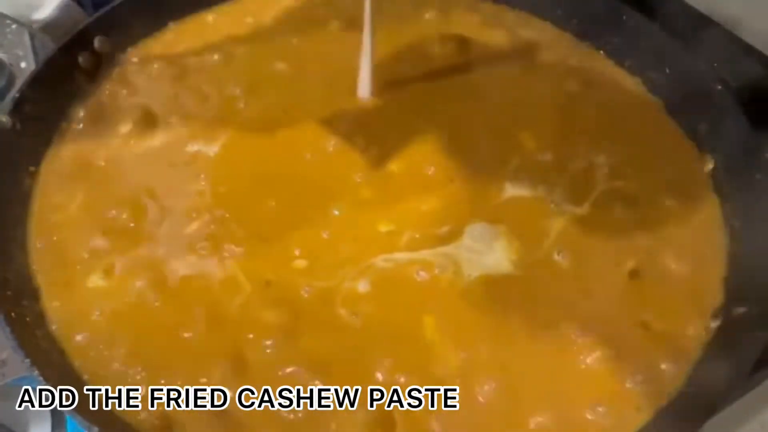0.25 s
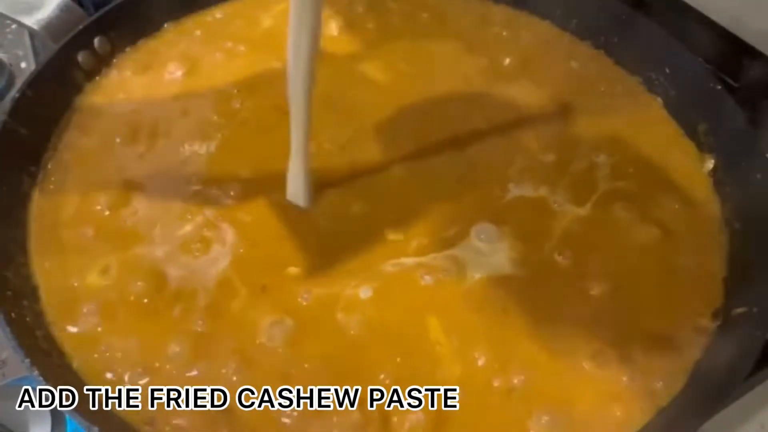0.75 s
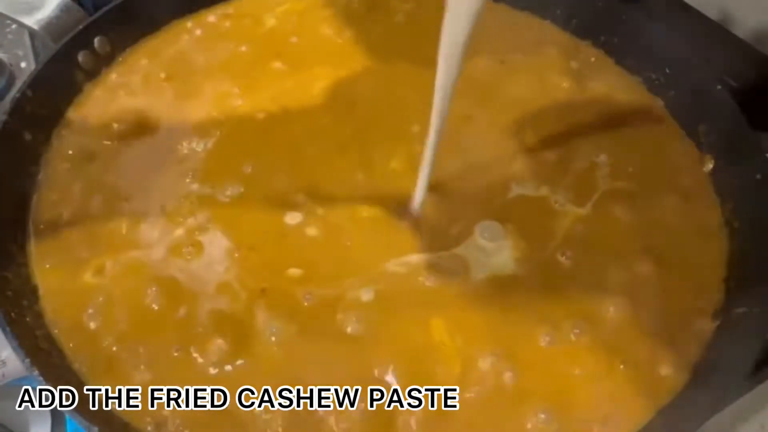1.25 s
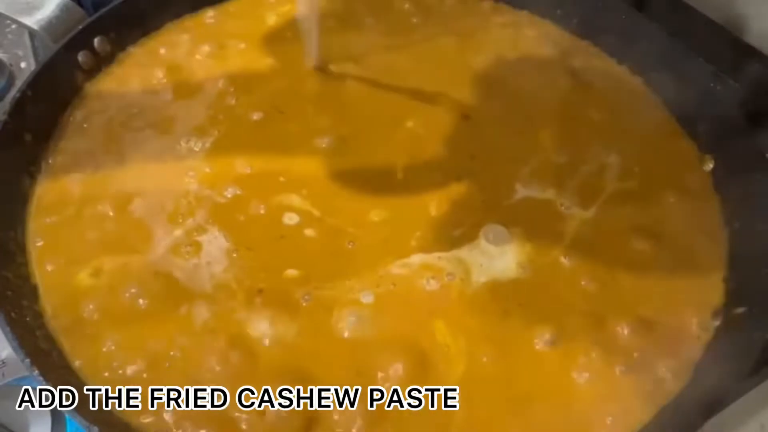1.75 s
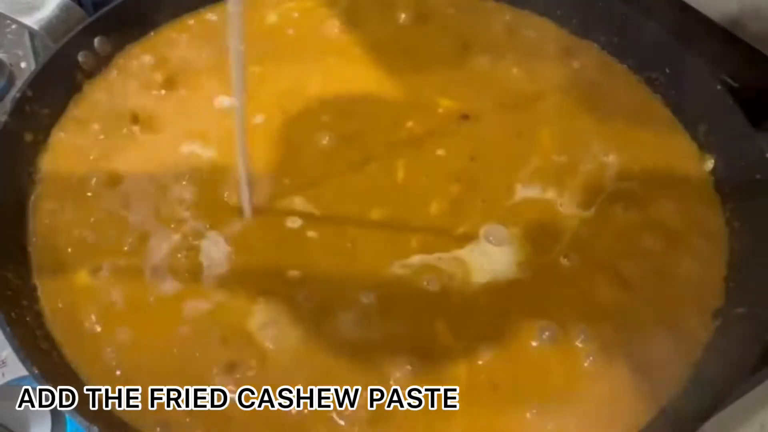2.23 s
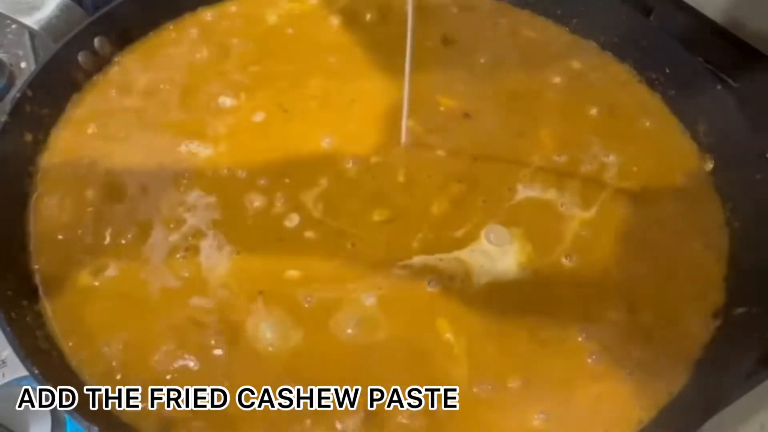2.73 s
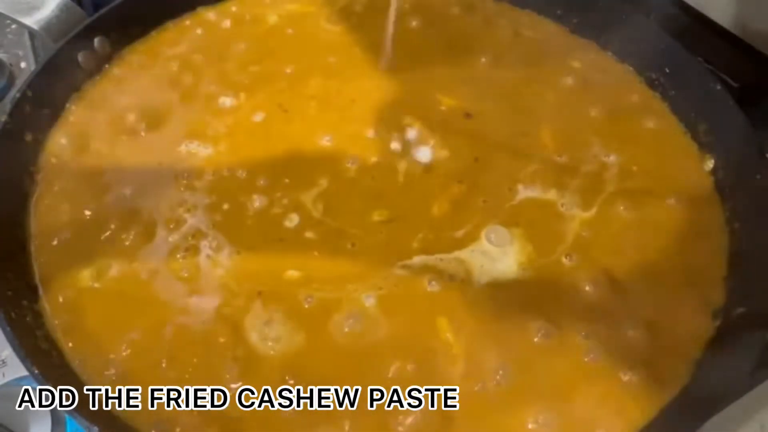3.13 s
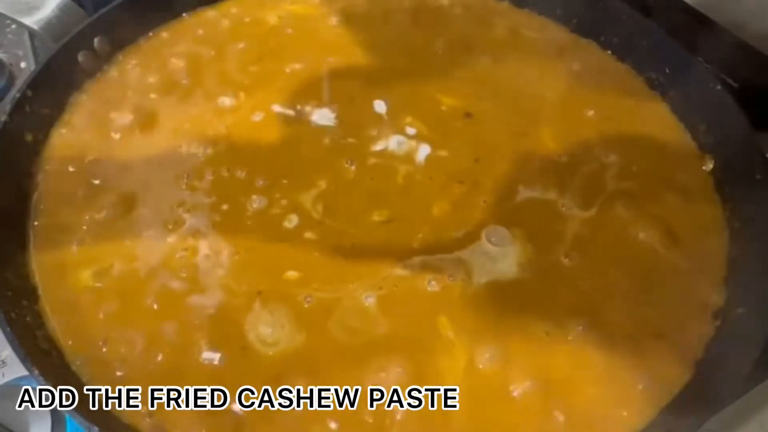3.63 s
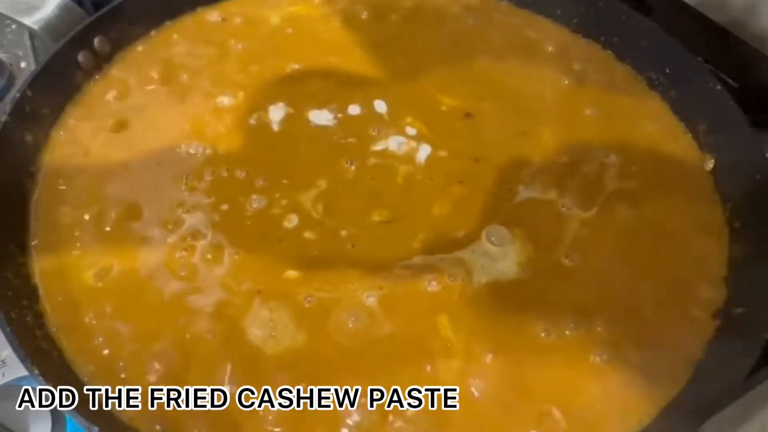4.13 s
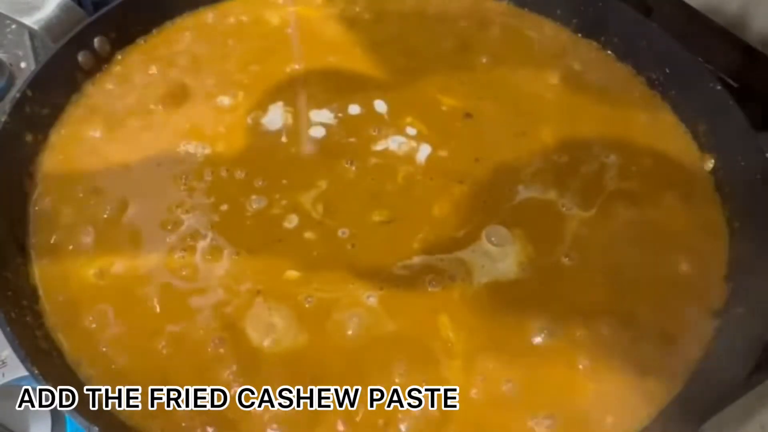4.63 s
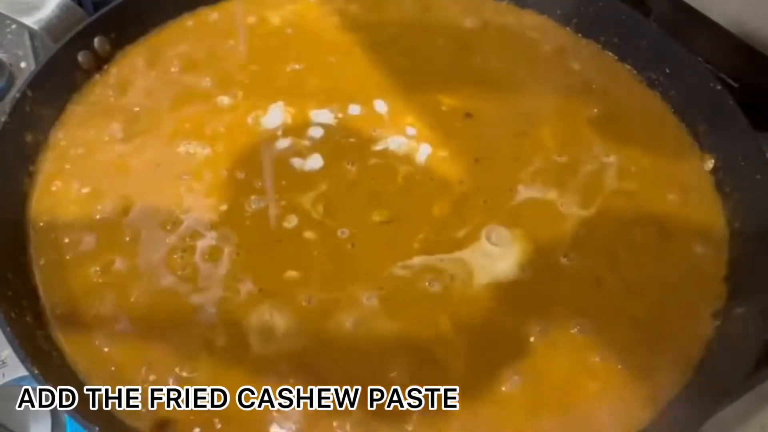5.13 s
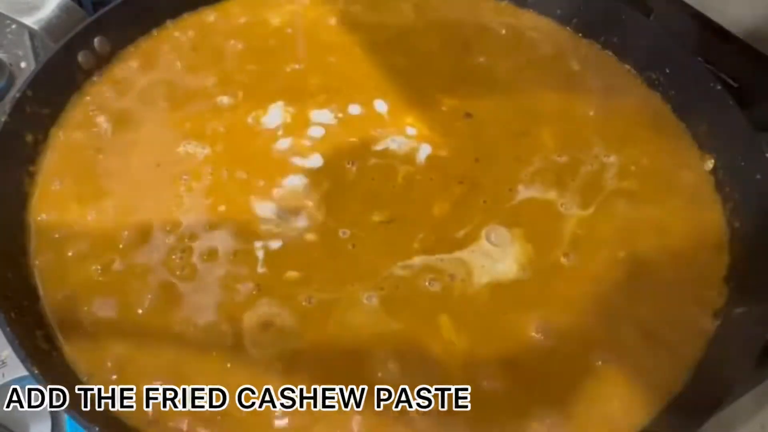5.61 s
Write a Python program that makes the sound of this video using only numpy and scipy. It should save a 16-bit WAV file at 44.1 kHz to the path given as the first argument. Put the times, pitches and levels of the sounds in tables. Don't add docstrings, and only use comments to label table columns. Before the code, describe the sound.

Close stereo pickup above a pan of thick gravy on a kitchen stove. A low burner rumble and soft hiss run throughout. Small bubbles murmur, bigger ones burst with short rising plops, mostly to the left, amid crisp spatter ticks and low bumps. After four seconds a vessel scuffs and knocks twice, quickly and loudly; then the simmer continues with a thin sizzle.

```python
import sys
import numpy as np
from scipy import signal
from scipy.fft import rfft, irfft, next_fast_len
from scipy.io import wavfile
from scipy.ndimage import uniform_filter1d, minimum_filter1d

SR = 44100
rng = np.random.default_rng(int(sys.argv[2]) if len(sys.argv) > 2 else 0)


def to_wav(s):
    ch = np.atleast_2d(s).T
    pcm = np.round(np.clip(ch, -1, 1) * 32767)
    wavfile.write(sys.argv[1], SR, pcm.astype(np.int16))


def level_to_linear(level):
    exponent = np.asarray(level, float) / 20
    return 10 ** exponent


N = 258867

# time in seconds, level in dB.
FLAME = [(0, -52), (1.05, -53), (1.8, -51.5), (2.7, -54.5), (2.93, -50), (3.5, -53), (4.05, -53.5),
         (4.36, -49.5), (4.69, -54.5), (5.02, -50.5), (5.3, -52.5), (5.87, -52)]
# pitch in Hz, level in dB per Hz.
RUMBLE = [(24, -40), (36, -4), (50, -2), (100, -0.5), (200, -9.5), (400, -30.5), (800, -20.5)]
# pitch in Hz, width in Hz, level in dB.
STOVE_HUM = (51.8, 11, -5.5)
# pitch in Hz, level in dB per Hz.
HISS = [(250, 9.5), (400, 4), (630, 3.5), (1000, 6), (1600, 6), (2500, 1.5), (4000, -1), (5500, 2),
        (7500, -5), (8500, -6.5), (10000, -4.5), (11000, -1), (11700, -4.5), (12600, -20)]
# pitch in Hz, width in Hz, level in dB.
FLAME_NOTE = (630.5, 86, -11.5)
# pitch in Hz, likeness from 0 to 1.
LIKENESS = [(60, 1), (130, 1), (270, 0.93), (600, 0.44), (1250, 0.21), (2300, 0.34), (4000, 0.63),
            (6000, 0.079), (7400, 0.021), (8500, 0.83), (10000, 0.82), (11200, 0.91)]
# time in seconds, level in dB.
SIZZLE = [
    (0, -65),
    (1.5, -67),
    (3, -69),
    (4.2, -67.5),
    (4.8, -57.5),
    (5.87, -59.5),
]
# time in seconds, small bubbles in dB.
VIGOUR = [
    (0, -47),
    (1, -49.5),
    (1.6, -55.5),
    (2.4, -49.5),
    (3.4, -61.5),
    (3.86, -51),
    (4.1, -56),
    (5.87, -70),
]
# start in seconds, peak in dB, pitch in Hz.
BLIPS = [(.123, -44, 774), (.203, -45, 670), (.386, -43, 810), (.584, -50, 670), (0.768, -43.5, 590),
         (.855, -43.5, 710), (1.094, -47, 730), (1.119, -43, 720), (1.238, -45, 648), (1.329, -49, 990),
         (1.381, -43.5, 715), (1.445, -51, 544), (1.471, -46, 714), (2.085, -36.5, 650), (2.49, -47, 527),
         (2.592, -46, 586), (2.92, -45, 496), (2.951, -42.5, 673), (3.005, -46.5, 352), (3.568, -47, 616),
         (3.906, -44, 634), (3.986, -43, 730), (4.63, -44, 604), (4.744, -57, 730), (4.911, -44, 624),
         (4.989, -43.5, 750), (5.013, -47.5, 462), (5.255, -47, 608), (5.308, -47.5, 346),
         (5.484, -47, 636), (.751, -53, 357), (1.023, -55, 520), (1.903, -37.5, 616), (1.979, -45, 1020),
         (2.157, -49, 644), (2.435, -42.5, 630), (2.664, -46.5, 780), (2.685, -47.5, 630),
         (2.845, -44, 1050), (3.7, -53, 600), (3.73, -44, 986), (3.775, -38, 610), (3.832, -44, 706),
         (3.87, -37.5, 1290), (3.951, -46, 607), (4.069, -49, 590), (4.171, -48, 634), (4.509, -52, 555),
         (4.64, -49, 760), (4.931, -49, 600), (5.42, -44, 770), (5.827, -48.5, 630)]
# start in seconds, peak in dB, pitch in Hz, left over right in dB.
PLOPS = [(.261, -36.5, 830, 9), (.412, -40, 686, 5), (.46, -39.5, 785, 14), (.537, -34.5, 1200, 2),
         (.706, -45, 765, 2), (1.025, -32.5, 867, 10), (1.531, -40.5, 930, 3), (1.745, -41, 1504, 3),
         (1.788, -33.5, 1075, 7), (1.834, -39, 1090, 6), (1.903, -34, 1040, 3), (2.008, -42.5, 573, 8),
         (2.083, -32.5, 1044, 9), (2.13, -41, 700, 4), (2.437, -35.5, 1144, 9), (2.776, -35, 986, 7),
         (2.975, -38, 1090, 1), (3.139, -33, 1430, 2.5), (3.263, -44.5, 627, 5), (3.524, -35, 800, 9),
         (3.761, -36, 940, 8), (4.034, -38, 1600, 4), (4.213, -42, 780, 3), (4.431, -40, 1100, -4),
         (4.605, -35, 1110, 2), (4.659, -43, 990, 0), (4.853, -37, 800, 9), (5.326, -42.5, 600, 6),
         (5.434, -40.5, 820, 5)]
# start in seconds, peak in dB, pitch in Hz.
BUMPS = [(0.174, -47.5, 63.6), (0.322, -62, 59.2), (1.228, -41, 50.3), (1.599, -26, 91), (1.895, -57, 55.8),
         (2.289, -40, 61.4), (2.718, -28.5, 67.3), (4.042, -28, 105), (4.214, -36, 56), (4.804, -36.5, 91),
         (4.941, -51, 51.5), (5.256, -33.5, 72.6), (5.342, -35, 94.5), (0.248, -40, 56),
         (0.475, -32.5, 62.5), (0.593, -43, 74), (1.366, -40, 44.4), (1.44, -43, 142), (2.101, -35, 60),
         (2.372, -40, 51.5), (3.434, -42, 88), (3.5, -46, 54.4), (3.768, -38, 60.3), (4.43, -37, 69.4),
         (4.72, -36, 70.6)]
# start in seconds, peak in dB, centre in Hz, left over right in dB.
TICKS = [(0.375, -30.5, 2200, 8), (0.3984, -34, 2970, 1.5), (.412, -28, 4800, 6), (0.546, -37, 2210, -8),
         (0.703, -32, 2750, 0), (.8604, -37, 3580, 0), (0.877, -28.5, 6300, 13), (1.24, -26, 3000, 2),
         (1.533, -26, 10200, 2), (1.8342, -24.5, 7800, 14.5), (1.882, -37.5, 2570, -15),
         (1.9033, -13.5, 10000, 1), (2.37, -35.5, 2130, -9), (2.488, -27.5, 2080, -7.5),
         (2.916, -33.5, 2720, -8), (3.3013, -34, 2730, -9), (3.443, -28.5, 5900, 9),
         (3.568, -38.5, 2070, -27), (3.5888, -39.5, 4240, 3), (3.6017, -27, 9870, 1.5),
         (3.804, -30, 2060, 7), (3.966, -28, 2040, -1), (4.7343, -28, 2270, 0), (4.7513, -33, 4500, 6),
         (4.9224, -34.5, 4640, 4), (5.122, -32.5, 3370, -1.5), (5.4252, -29, 6700, 4),
         (5.4904, -33, 2270, -6), (5.5766, -32, 4950, 5), (5.7455, -31.5, 4500, 5),
         (1.3054, -35.5, 10900, 0.5), (1.445, -39, 11150, 1), (1.4708, -34.5, 9800, 0),
         (2.373, -34, 10760, 7), (3.1417, -34, 11650, -5.5), (3.85, -36, 11000, 3), (4.305, -30, 3500, 2),
         (1.8334, -28, 11500, 0)]
# start in seconds, bright spray
# in dB, broad splash in dB, left over right in dB.
BURSTS = [(.376, -37, -32, 7), (0.548, -36, -26, 1), (0.705, -63, -25.5, -15.5), (1.3055, -46, -52, -1),
          (0.831, -37, -25, 3), (1.069, -32.5, -55, 9), (1.026, -45, -33, 0), (.539, -45, -33, 0),
          (2.009, -50, -39, 0), (3.569, -46, -37, 0), (1.445, -42, -32.5, -15), (1.471, -47, -37, 0),
          (1.5326, -38.5, -39, 17), (1.6765, -29, -41, 6.5), (1.7878, -28, -51, 3),
          (1.8342, -26.5, -33, -6), (1.9034, -20, -24.5, 6), (1.974, -36, -57, -1), (2.081, -27, -20, 4),
          (2.176, -29.5, -23.5, 0), (2.25, -62, -25.5, -3), (2.489, -28, -22.5, 7), (2.919, -36, -26.5, -5),
          (2.374, -53, -51, 2.5), (3.1384, -35.5, -55, 5.5), (3.302, -42, -25, 19), (3.775, -25, -24.5, 5),
          (3.804, -32.5, -28, 6), (4.4366, -36, -41, 1), (4.748, -34.5, -29, -8), (4.875, -37, -36, 3),
          (4.9241, -31.5, -31, 2), (5.121, -36, -36, 3), (5.5776, -32, -59.5, 7), (0.613, -38, -54, 1),
          (.8122, -36.5, -31, 0), (.978, -36, -43, -2), (1.056, -35, -48, 3), (1.6652, -32.5, -35, 1),
          (2.392, -49, -46, 2), (2.4394, -38, -33, -4), (2.7672, -42, -47, 2), (2.783, -36.5, -45, 5),
          (2.8153, -41, -48, 3), (2.9343, -33.5, -40, 0), (3.384, -34.5, -27, 3), (3.8502, -44, -39, 0),
          (4.2626, -50, -38, 0), (4.3726, -22, -38, 3), (4.6268, -45, -42, 2), (4.759, -32.5, -29, 1),
          (4.815, -44.5, -53, 1), (4.929, -35, -26, 3), (.7683, -40, -29, 1)]
# start in seconds, level in dB, crack in dB, second landing in dB,
# delay of the body in seconds.
KNOCKS = [
    (4.265, -12, -6.5, -18, 0.00123),
    (4.3723, -18.5, -12, -3.5, 0.00168),
]
# pitch in Hz, level in dB, time to fall by 60 dB in seconds.
KNOCK_MODES = [
    [(225, -9, 0.043), (434, -16, 0.019), (620, 5, 0.047), (800, 7.5, 0.036), (1100, -6, 0.021),
     (1240, -2, 0.037), (1600, 0.5, 0.015), (1890, -3, 0.021), (2180, -4, 0.039), (2800, -26, 0.029),
     (2980, -11, 0.036), (3355, 5, 0.017), (3820, -6, 0.055), (5200, 1.5, 0.011)],
    [(274, -13, 0.058), (520, 7, 0.0095), (632, 10.5, 0.035), (687, 5, 0.039), (832, 11.5, 0.026),
     (1134, 8, 0.034), (1333, 5.5, 0.032), (1510, -12, 0.022), (1980, -18, 0.015), (2270, -7.5, 0.02),
     (3000, -2.5, 0.028), (3500, -7.5, 0.039), (5700, -0.5, 0.023), (8700, -12, 0.015)],
]
# pitch in Hz, width in Hz, level in dB.
HOLLOWS = [(800, 560, 3), (1166, 190, 3), (1920, 450, 0), (3700, 600, -4.5), (5150, 2100, -11)]
# pitch in Hz, level in dB per Hz.
KEEP_ABOVE = [(1200, -102), (1700, -91), (2300, -91.5), (3000, -93.5), (4000, -96.5), (6000, -100),
              (7500, -103), (8900, -101), (10000, -93.5), (10450, -92.5), (10900, -98.5), (11400, -94),
              (11700, -89.5), (13000, -92)]
# time in seconds, middle range in dB, top range in dB.
STRICTNESS = [(0, -1, -2.5), (.3, 1.5, 1), (.37, 2, -1), (.45, 3.5, 0), (.6, -0.5, -2), (.95, -1.5, -1),
              (1.06, 3, -0.5), (1.14, -1, 2.5), (1.5, 0, 0.5), (2.5, -2, -2.5), (2.68, 1, 5),
              (2.8, 0, -0.5), (4.2, -0.5, -1), (4.32, 8.5, 15), (4.45, 1.5, -0.5), (4.999, 2.5, -1),
              (5.27, 2, -1), (5.45, -1.5, -2.5)]

RIGHT_LAG = 10.757
TOP_HZ = 12630


def rms_one(x):
    return x / np.sqrt(np.mean(x ** 2) + 1e-20)


def in_time(rows):
    s, *columns = np.transpose(rows)
    return [np.interp(np.arange(N) / SR, s, c) for c in columns]


def at_hz(points, hz):
    table_hz, values = np.transpose(points)
    return np.interp(np.log(hz), np.log(table_hz), values)


def drift(rate):
    r = np.exp(-80 * np.pi * rate / SR)
    slow = signal.lfilter([1], [1, -2 * r, r * r], rng.standard_normal(N // 40 + 2002))[2000:]
    return np.interp(np.arange(N) / 40, np.arange(len(slow)), rms_one(slow))


def band(x, low_hz, high_hz):
    sos = signal.butter(2, [low_hz, min(high_hz, .45 * SR)], "band", fs=SR, output="sos")
    return signal.sosfilt(sos, x)


def add(out, s, sound, pan_db):
    i = round(s * SR)
    sides = level_to_linear([[pan_db / 2], [-pan_db / 2]])
    piece = (np.ones((2, 1)) * sound * sides)[:, :N - i]
    out[:, i:i + piece.shape[1]] += piece


def banded_noise(spectrum, patchy_db, grain):
    out, together = 0, drift(8.5)
    low_end, high_end = spectrum[0][0], spectrum[-1][0]
    edges = low_end * 2 ** np.arange(0, np.log2(high_end / low_end) + .3, 1 / 3)
    clicks = rng.random((2, 1, N)) < 900 / SR
    crackle = clicks * level_to_linear(4.5 * np.minimum(rng.exponential(1, (2, 1, N)), 3.5))
    white = rng.standard_normal((2, 2, N)) * (1 + grain * rms_one(crackle))
    for k, (low, high) in enumerate(zip(edges, edges[1:])):
        mid, side = band(white[k % 2], low, high)
        hz = np.sqrt(low * high)
        alike = np.clip(at_hz(LIKENESS, hz), -1, 1)
        gain = level_to_linear(at_hz(spectrum, hz) + patchy_db * (0.32 * together + drift(25.0)))
        out = out + gain * (np.sqrt(1 + alike) * mid + np.sqrt(1 - alike) * side * [[1], [-1]])
    return rms_one(out)


def hollow(hz, width_hz, db, apart):
    mid, side = band(rng.standard_normal((2, N)), hz - width_hz / 2, hz + width_hz / 2)
    return level_to_linear(db) * rms_one(mid + apart * side * [[1], [-1]])


def plop(hz, cycles, rise, swell=0.31):
    turns = np.arange(round(3 * cycles * SR / hz)) * hz / SR
    shape = (1 - np.exp(-turns / swell)) ** 2 * np.exp(-2.3 * turns / cycles)
    phase = 0.912 * turns + rise * turns ** 2 / (2 * cycles)
    return shape / shape.max() * np.sin(2 * np.pi * phase)


def hollows(noise):
    return sum(level_to_linear(db) * band(noise, hz - width_hz / 2, hz + width_hz / 2) for hz, width_hz, db in HOLLOWS)


def burner(rumble_db):
    roar = banded_noise(RUMBLE, patchy_db=2.0, grain=0.013)
    return level_to_linear(rumble_db + 3.5) * (roar + hollow(*STOVE_HUM, apart=0.033))


def steam(rumble_db):
    hiss_db = -54.5 + 0.054 * (rumble_db - rumble_db.mean())
    hiss = banded_noise(HISS, patchy_db=2.0, grain=0.55)
    return level_to_linear(hiss_db + 6.5) * (hiss + hollow(*FLAME_NOTE, apart=0.18)) * level_to_linear([[1.2], [-1.2]])


def rim_sizzle():
    level_db, = in_time(SIZZLE)
    return level_to_linear(level_db) * rms_one(band(rng.standard_normal(N), 8600, 10300))


def small_bubbles(level_db, per_s, count):
    out, luck = np.zeros((2, N)), rng.random((count, 5))
    for when, size, pitch, glide, place in luck[:round(per_s * N / SR)]:
        hz = 480 * 2 ** (2.1 * pitch ** 1.2)
        loudness = (1.05 - size) ** -.35
        add(out, when * N / SR, loudness * plop(hz, 1.7, .5 * glide), 8 * place - 2.5)
    return level_to_linear(level_db) * rms_one(out)


def large_bubbles():
    rows = PLOPS + [(*blip, 7) for blip in BLIPS]
    out, luck = np.zeros((2, N)), rng.random((len(rows), 2))
    for (s, db, hz, pan_db), (glide, length) in zip(rows, luck):
        cycles = max(8.1 + 3.1 * (length - .5), 2)
        add(out, s, level_to_linear(db + 4.0) * plop(hz, cycles, 0.22 + 0.56 * glide, swell=0.4), pan_db - 2.5)
        add(out, s, level_to_linear(db - 8) * plop(0.394 * hz, 2.3, 0.54), pan_db - 2.0)
    return out


def bumps():
    out = np.zeros((2, N))
    for s, db, hz in BUMPS:
        add(out, s, level_to_linear(db - 2.5) * plop(hz, 1.6, -0.025, swell=0.99), 1.5)
    return out


def droplets(count):
    out, t = np.zeros((2, N)), np.arange(900) / SR
    luck, noise = rng.random((count, 4)), rng.standard_normal((len(TICKS) + count, len(t)))
    strays_per_s = 3.5
    strays = [(when * N / SR, -39.5 + 8 * (size - .5), 3620 * 2 ** (0.4 * pitch), 12 * place - 3)
              for when, size, pitch, place in luck[:round(strays_per_s * N / SR)]]
    for (s, db, hz, pan_db), ring in zip(TICKS + strays, noise):
        fade = np.exp(-t / 0.0033 * (hz / 3000) ** 0.17)
        add(out, s, level_to_linear(db - 5.5) * rms_one(band(ring, hz / 1.2, hz * 1.11)) * fade, pan_db)
    return out


def spatter(count):
    out, t = np.zeros((2, N)), np.arange(900) / SR
    luck, noise = rng.random((count, 3)), rng.standard_normal((len(BURSTS) + count, 2, len(t)))
    fizz_per_s, fizz_db = 34, -49
    fizz = [(when * N / SR, fizz_db + 6 * (size - .5), fizz_db - 8.5, 10 * place - 3)
            for when, size, place in luck[:round(fizz_per_s * N / SR)]]
    opening = (1 - np.exp(-t / 0.00054)) ** 2
    spit_fade = np.exp(-t / 0.0053) + 2.1 * np.exp(-t / 0.0007)
    splash_fade = np.exp(-t / 0.0037) + 1.9 * np.exp(-t / 0.00086)
    for (s, spray_db, splash_db, pan_db), (spray, wet) in zip(BURSTS + fizz, noise):
        spit = rms_one(band(spray, 5300, 11800)) * spit_fade
        splash = rms_one(band(wet, 420, 3300)) * splash_fade
        add(out, s, level_to_linear(spray_db - 7.0) * spit * opening, 0.86 * pan_db)
        add(out, s, level_to_linear(splash_db - 12.5) * splash * opening, 0.4 * pan_db - 0.5)
    return out


def surroundings(x):
    t = np.arange(round(.25 * SR)) / SR
    fall = np.exp(-t / 0.0013) + level_to_linear(-19.0) * np.exp(-t / 0.034)
    echoes = band(rng.standard_normal((2, len(t))) * fall * (t > .0004), 520, 6100)
    echoes = echoes / np.sqrt(np.sum(echoes ** 2, axis=1, keepdims=True))
    return signal.fftconvolve(x, echoes, axes=1)[:, :N]


def scuff():
    level_db, drop_db, swell_s, settle_s = -42.5, 5.5, 0.027, 0.12
    first, last = KNOCKS[0][0] - 0.0096, KNOCKS[1][0]
    scuff_db, = in_time([(first - 2 * swell_s, -90), (first - swell_s, level_db - drop_db),
                         (first, level_db), (last, level_db + 7.0),
                         (last + settle_s, level_db - drop_db), (last + 2 * settle_s, -90)])
    rough = level_to_linear(1.5 * drift(60)) * hollows(rng.standard_normal((2, N)))
    return level_to_linear(scuff_db - 5.5) * rms_one(rough)


def vessel_ring(modes, late_s, t):
    ring, sideways_db = 0, 4.5
    for k, (hz, g, t60) in enumerate(modes):
        body, sideways = hz < 1400, 1500 < hz < 2600
        u = np.maximum(t - late_s * body, 0)
        right_gain = level_to_linear(sideways_db * sideways - 14 * (hz > 3300))
        sides = [np.sin(2 * np.pi * hz * u),
                 np.sin(2 * np.pi * (hz * u + sideways / 4)) * right_gain]
        build_up = (1 - np.exp(-u * hz / (0.55 if body else 0.3))) ** 2
        sign = -1 if body else (-1) ** k
        ring = ring + level_to_linear(g - 3.0 - 60 * u / t60) * build_up * sign * np.array(sides)
    return ring


def knocks():
    out, t = np.zeros((2, N)), np.arange(5000) / SR
    for (s, db, crack_db, again_db, late_s), modes in zip(KNOCKS, KNOCK_MODES):
        ring = vessel_ring(modes, late_s, t)
        crack_fade = np.exp(-t / 0.0012) + 0.93 * np.exp(-t / 0.0065)
        crack = level_to_linear(crack_db) * rms_one(band(rng.standard_normal((2, len(t))), 890, 4600)) * crack_fade
        crack = crack * (1 - np.exp(-t / 0.00093)) ** 2 * level_to_linear([[0], [4.5]])
        add(out, s, level_to_linear(db) * (ring + crack), 3.0)
        add(out, s + 0.0073, level_to_linear(db + again_db) * band(ring, 300, 1070), 3.0)
        wash = rms_one(hollows(rng.standard_normal((2, len(t)))))
        wash = wash * np.exp(-t / 0.053) * (1 - np.exp(-t / 0.0026))
        add(out, s, level_to_linear(db - 23) * wash, 1.5)
    return out + scuff()


def scene():
    (rumble_db,), (murmur_db,) = in_time(FLAME), in_time(VIGOUR)
    stove = burner(rumble_db) + steam(rumble_db) + rim_sizzle()
    pan = small_bubbles(murmur_db - 7.0, per_s=150.0, count=1200) + large_bubbles()
    pan = pan + droplets(count=60) + spatter(count=150)
    pan = level_to_linear(-1.5) * pan + level_to_linear(-12) * surroundings(pan)
    left, right = stove + pan + bumps() + knocks()
    size = next_fast_len(N + 64)
    later = np.exp(-2j * np.pi * np.arange(size // 2 + 1) * RIGHT_LAG / size)
    return np.array([left, irfft(rfft(right, size) * later, size)[:N]])


def thin(pair, size):
    window = np.sin(np.pi * (np.arange(2 * size) + .5) / (2 * size))
    hz, _, cells = signal.stft(pair, SR, window, 2 * size, size, scaling="psd")
    edges = np.r_[0:64:64, 64:160:8, 160:320:20, 320:384:32, 384:1024:16]
    edges = np.unique(edges * size // 1024)
    widths = np.diff(np.r_[edges, len(hz)])
    power = np.add.reduceat(2 * abs(cells) ** 2, edges, axis=1) / widths[:, None]
    level_db = at_hz(KEEP_ABOVE, hz[edges + widths // 2] + 1) + (4.5 if size < 1024 else 0)
    s, middle_db, top_db = np.transpose(STRICTNESS)
    at = (np.arange(power.shape[2]) * size - 353) / SR
    top, middle = (hz[edges] > 9800)[:, None], (hz[edges] < 2950)[:, None]
    stricter_db = np.where(top, np.interp(at, s, top_db), np.interp(at, s, middle_db) * middle)
    keep = power > level_to_linear(2 * (level_db[:, None] + stricter_db))
    kept = cells * np.repeat(keep, widths, axis=1)
    return signal.istft(kept, SR, window, 2 * size, size, scaling="psd")[1][:, :pair.shape[1]]


def drop_weak_bands(x):
    lead = 1024 - 671
    pair = np.pad([x[0] + x[1], x[0] - x[1]], ((0, 0), (lead, 0))) / 2
    treble = uniform_filter1d(band(x[0], 7200, TOP_HZ) ** 2, size=64)
    before = np.roll(uniform_filter1d(treble, size=512), 300)
    snap = np.pad(treble > level_to_linear(2 * 9.5) * before, (lead, 0)) * 1.0
    near = uniform_filter1d(np.roll(-minimum_filter1d(-snap, size=1900), 500), size=128)
    long, short = thin(pair, size=1024), thin(pair, size=128)
    swap = signal.sosfiltfilt(signal.butter(6, 9300, "high", fs=SR, output="sos"), short - long)
    mid, side = (long + near * swap)[:, lead:]
    return np.array([mid + side, mid - side])


def top_cut(x):
    return signal.sosfilt(signal.butter(12, 12850, fs=SR, output="sos"), x)


def record(dry):
    rounded = dry / (1 + abs(dry / .99) ** 12) ** (1 / 12)
    cut = signal.sosfilt(signal.cheby2(8, 40, TOP_HZ, fs=SR, output="sos"), rounded)
    mix = drop_weak_bands(cut)
    return top_cut(mix)


dry = scene()
out = record(dry)
to_wav(out)
```